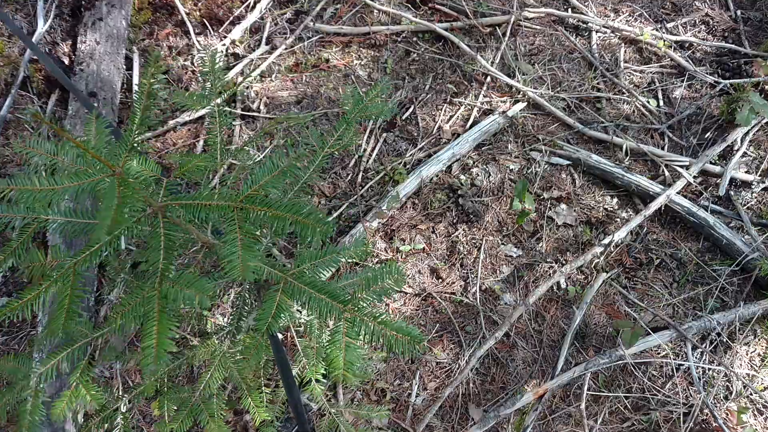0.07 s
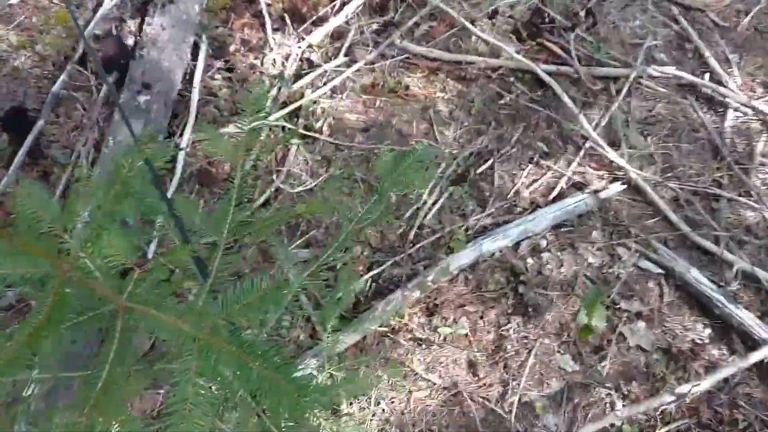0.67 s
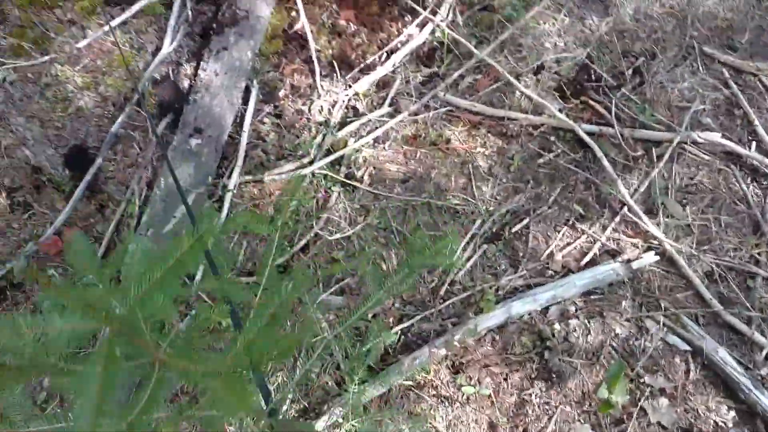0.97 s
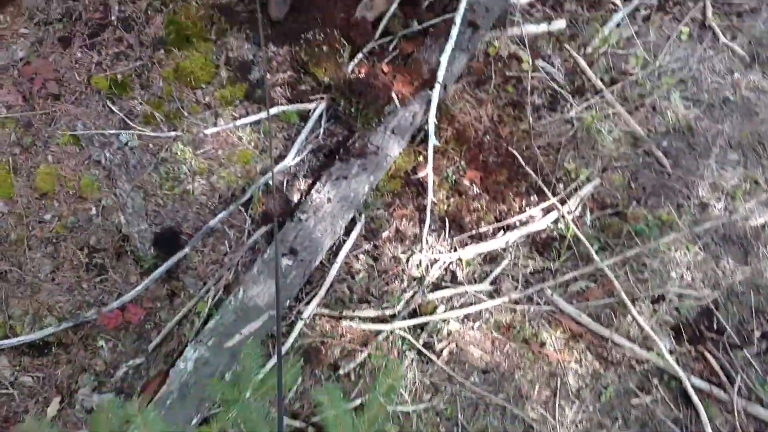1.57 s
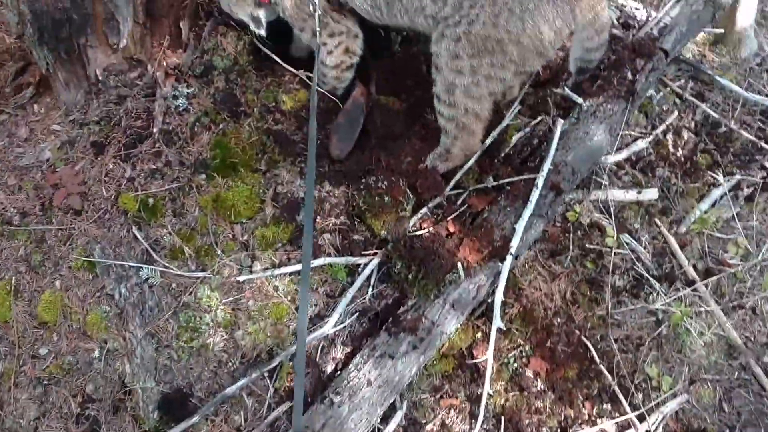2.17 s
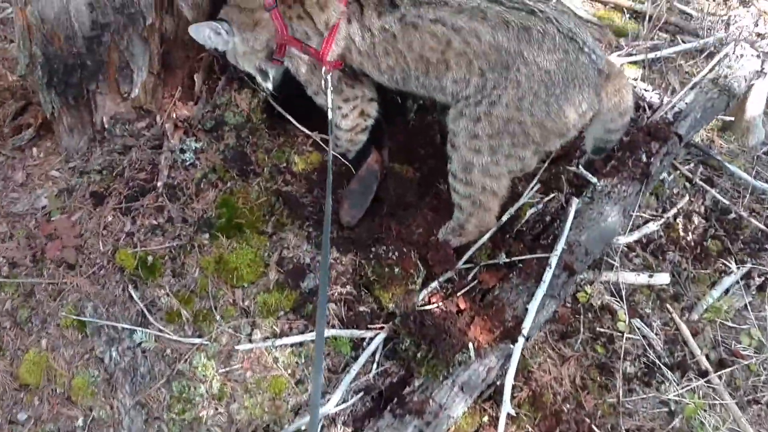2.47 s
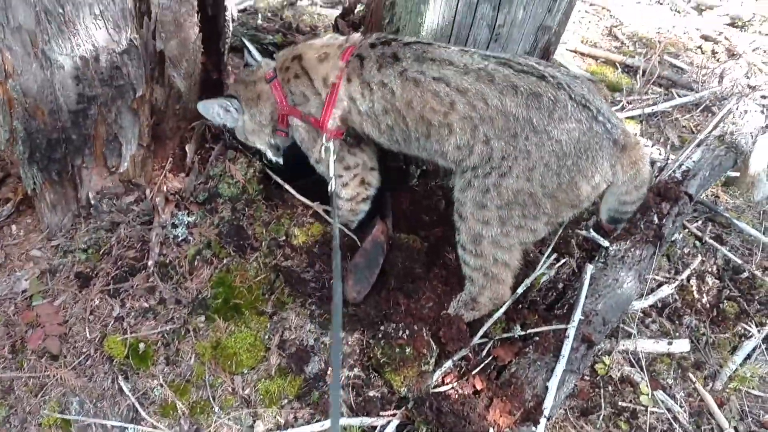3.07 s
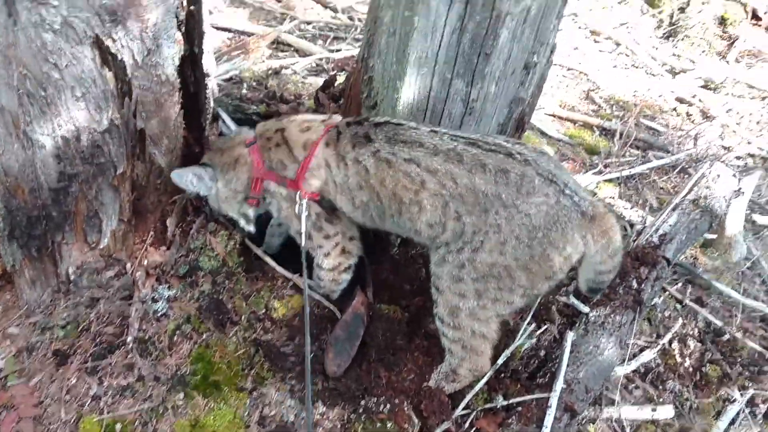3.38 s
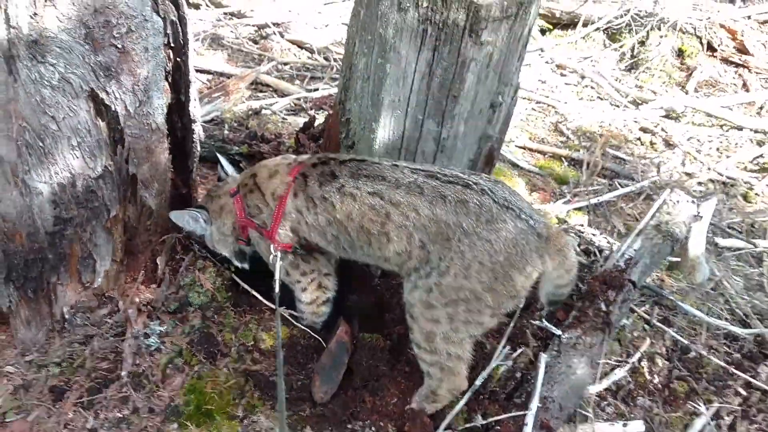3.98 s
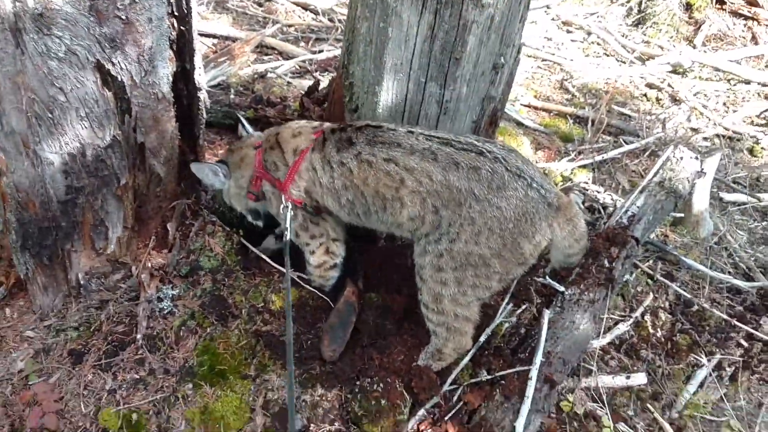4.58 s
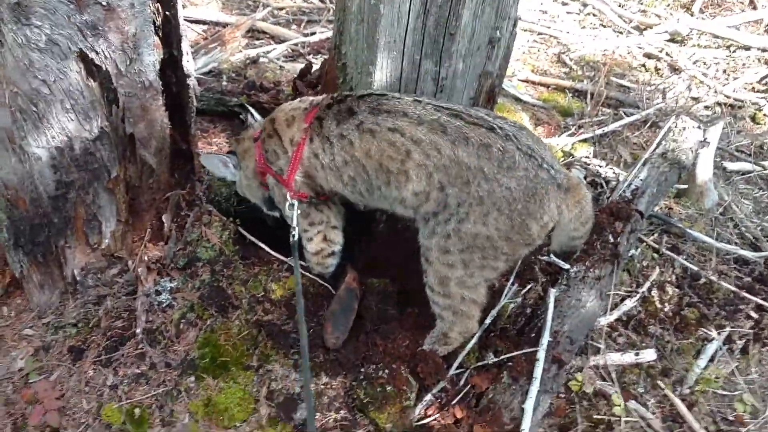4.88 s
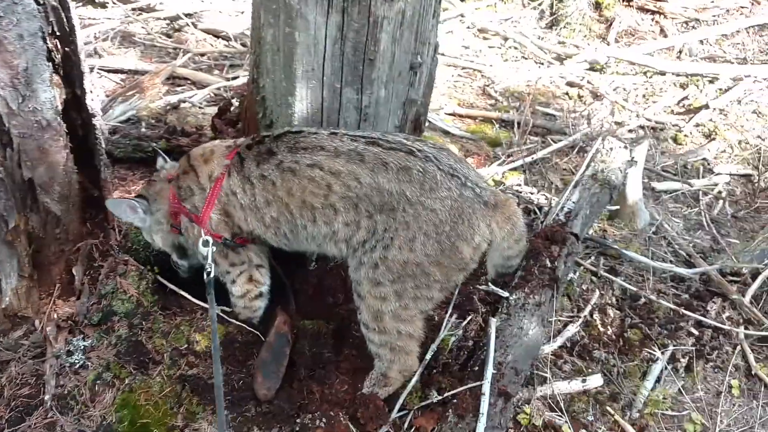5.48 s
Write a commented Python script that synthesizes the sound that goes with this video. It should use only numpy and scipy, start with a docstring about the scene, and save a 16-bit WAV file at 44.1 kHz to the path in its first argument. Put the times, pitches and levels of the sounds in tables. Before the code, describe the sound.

A cat scrapes through dry forest litter with crackling needles and snapping twigs, as wind buffets the microphone and a finger rubs it.

```python
"""A cat scrapes through soil and dry litter by a stump, heard from a phone carried through a breezy wood.
First needles crackle, crumbs grate and twigs snap, hardest just before 0.8 s. From about 1.3 s gusts
rumble under the scraping; eddies then buffet the microphone ports, most heavily around 4 s. From 4.3 s
a finger rubs, creaks and slips on the case. The phone crossfeeds its two ports to widen the stereo."""
import sys
import numpy as np
from scipy import signal
from scipy.fft import rfft, irfft
from scipy.io import wavfile
from scipy.ndimage import uniform_filter1d

SR = 44100
rng = np.random.default_rng(int(sys.argv[2]) if len(sys.argv) > 2 else 0)


def int16_out(signal):
    """Quantize to a 16-bit WAV file."""
    q = np.round(np.clip(np.atleast_2d(signal).T, -1, 1) * 32767)
    wavfile.write(sys.argv[1], SR, q.astype(np.int16))


N = 247842
TIME = np.arange(N) / SR
PORT_LAG = 17  # samples that sound needs from one port to the other
GRIP_S = 4.45  # from here on the finger rests on the case

# Grittiness of the litter; above zero a few big grains stick out: t/s, size spread/dB
GRITTINESS = [(0, -2.5), (.6, 1.5), (.73, -3.5), (.95, -3), (1.8, -2.5), (2.4, 4), (3.2, -3), (4, -4.5),
              (5.6, 4)]
# Steady stirring of the litter: t/s, needle level/dB, soil level/dB
LITTER_STIR = [(.2, -91, -82), (.28, -80, -58), (.5, -56, -61.5), (.85, -53.5, -67), (1.08, -68, -83),
               (1.36, -65, -70), (1.5, -53, -62), (1.75, -59, -58), (1.95, -55.5, -56), (2.38, -65, -61),
               (2.7, -57, -53), (2.96, -70.5, -62), (3.4, -67, -57), (3.799, -61.5, -54.5),
               (4.42, -64.5, -63), (4.72, -62.5, -51), (5, -59, -56), (5.62, -69, -55.5)]
# Bright tone of dry needles and cracking twigs: f/Hz, level/dB
NEEDLE_SPECTRUM = [(300, -39.5), (1200, 0.5), (2200, -1.5), (3500, -3), (5500, -0.5), (8500, -0.5),
                   (11000, -4.5), (14500, -10), (16000, -54)]


def undb(db):
    """Decibels to gain."""
    return 10 ** (np.asarray(db) / 20)


def curve(rows):
    """Automation: rows of t/s, value joined by straight lines."""
    return np.interp(TIME, *np.transpose(rows))


def fade(t, t60):
    """Exponential decay, 60 dB down after t60 seconds."""
    return undb(-60 * t / t60)


def add(out, s, sound):
    """Mix a stereo sound in at s seconds."""
    i = max(int(s * SR), 0)
    out[:, i:i + sound.shape[1]] += sound[:, :max(N - i, 0)]


def eq_gain(points, size):
    """Gain per FFT bin from rows of f/Hz, level/dB, joined over log frequency."""
    hz, db = np.transpose(points)
    return undb(np.interp(np.log(np.fft.rfftfreq(size, 1 / SR) + 1), np.log(hz), db))


def colour(x, points, size=4096):
    """Minimum-phase EQ with the given spectrum; white noise keeps its power."""
    gain = eq_gain(points, size)
    gain /= np.sqrt(np.mean(gain ** 2))
    cepstrum = irfft(np.log(gain))[:size // 2]
    cepstrum[1:] *= 2
    response = irfft(np.exp(rfft(cepstrum, size)))
    return signal.fftconvolve(x, response[None], axes=1)[:, :x.shape[1]]


def diffuse(pair):
    """Sound from many directions: long waves reach both ports alike, short ones unrelated."""
    # Stereo width: f/Hz, side over mid/dB
    width = [(100, -14.5), (2600, -2.5), (5200, 1.5), (8000, 0.5), (11000, 2), (15000, -1.5)]
    mid = pair[0]
    side = irfft(rfft(pair[1]) * eq_gain(width, N), N)
    return np.array([mid + side, mid - side]) / np.sqrt(2)


def pan_left(x, db=4):
    """Lift the left port and lower the right: needles and twigs lie a little to the left."""
    return x * undb([[db], [-db]])


def port_delay(x):
    """Delay by the travel time between the ports."""
    return np.pad(x, ((0, 0), (PORT_LAG, 0)))[:, :N]


def grains(per_s, spread_db, t60, bed):
    """Stereo noise in tiny decaying bursts over a smooth bed, held near level 1."""
    size = undb(spread_db * np.minimum(rng.exponential(size=N), 4.5))
    hits = (rng.random(N) < per_s / SR) * size ** 2
    power = signal.lfilter([1], [1, -fade(1 / SR, t60) ** 2], hits) + 1e-9
    power /= np.maximum(uniform_filter1d(power, size=3500), 1e-9)
    return np.sqrt((power + bed) / (1 + bed)) * rng.standard_normal((2, N))


def push_power(rows, attack_s, build_db, t60):
    """Power of pushes (t/s, length/s, level/dB): each sets in, builds with pressure and dies away."""
    power = 0
    for start, length, db in rows:
        t = TIME - start
        attack = np.clip(t / attack_s, 0, 1)
        build = undb(db + build_db * (np.clip(t / length, 0, 1) - 1.5))
        release = fade(np.maximum(t - length, 0), t60)
        power += (attack * build * release) ** 2
    return power


def woodland(level_db=-56):
    """Faint, even air in the trees."""
    # Tone of the ambience: f/Hz, level/dB
    air_spectrum = [(30, 20), (150, -1.5), (400, 0), (1000, 0.5), (2000, -6.5), (5000, -11), (10000, -9.5),
                    (15000, -29)]
    return undb(level_db) * diffuse(colour(rng.standard_normal((2, N)), air_spectrum))


def airflow_db(gust_edge=6):
    """Wind strength: the breeze plus a swell per gust; an edge of 2 is a bell, higher is more abrupt."""
    # Breeze between gusts: t/s, level/dB
    breeze = [(.15, -69.5), (.38, -59), (.95, -61.5), (1.3, -42.5), (1.75, -45), (2.6, -38), (3.1, -41.5),
              (3.55, -37), (3.85, -30), (4.4, -35), (4.7, -43), (5.05, -44), (5.62, -52)]
    # Gusts over it: peak t/s, length/s, level/dB
    gusts = [(.806, 0.17, -49.5), (1.021, 0.029, -45), (1.152, 0.087, -42.5), (1.272, 0.019, -27),
             (1.375, 0.03, -30.5), (1.518, 0.086, -27.5), (1.629, 0.065, -30), (1.892, 0.11, -33.5),
             (1.984, 0.032, -39), (2.08, 0.026, -38), (2.22, 0.081, -36), (2.308, 0.072, -33.5),
             (2.394, 0.19, -30.5), (2.574, 0.12, -36), (2.694, 0.057, -35), (2.797, 0.1, -30),
             (2.955, 0.094, -26.5), (3.068, 0.15, -34), (3.201, 0.088, -26), (3.354, 0.041, -26),
             (3.51, .07, -41.5), (3.688, .13, -31), (3.96, 0.16, -23.5), (4.11, 0.061, -21),
             (4.248, 0.032, -30.5), (4.423, 0.032, -37), (4.961, 0.29, -31.5), (5.199, 0.021, -26.5),
             (5.422, 0.094, -36)]
    gust_power = sum(undb(db) ** 2 * np.exp(-np.abs(2 * (TIME - s) / length) ** gust_edge)
                     for s, length, db in gusts)
    return 10 * np.log10(undb(curve(breeze)) ** 2 + gust_power)


def wind(whirl_db=-43, whirl_growth=1.5, strong_db=-25):
    """Turbulence rumbles at each port; faster air breaks into smaller whirls, so gusts sound higher."""
    # Low rumble: f/Hz, level/dB
    rumble_spectrum = [(20, -2), (45, -14.5), (75, 4.5), (125, 3.5), (175, 0), (255, -12), (400, -30),
                       (600, -40.5), (1500, -67), (5000, -99)]
    # Low-mid flutter of the whirls: f/Hz, level/dB
    whirl_spectrum = [(120, -25.5), (260, 8), (360, -4), (520, -10.5), (800, -33.5), (1500, -24.5),
                      (4000, -60)]
    flow_db = airflow_db()
    rumble = colour(rng.standard_normal((2, N)), rumble_spectrum) * undb(flow_db + 3)
    whirls = colour(grains(per_s=60, spread_db=7, t60=.027, bed=.32), whirl_spectrum)
    return rumble + whirls * undb(whirl_db + whirl_growth * (flow_db - strong_db))


def buffets(trim_db=-2, width_cycles=.5, whirl_db=-17, whirl_ratio=1.91):
    """Each strong eddy thumps the right port with one short push and pull."""
    # Eddies: t/s, level/dB, f/Hz
    eddies = [(2.273, -18.5, 150), (2.289, -19.5, 148), (2.31, -19.5, 148), (2.389, -13.5, 140),
              (2.416, -11.5, 152), (2.447, -20, 143), (2.77, -17, 143), (2.783, -26, 152),
              (2.835, -20, 117), (2.961, -16.5, 173), (2.98, -24, 140), (3.184, -22, 133),
              (3.217, -27, 125), (3.242, -19, 121), (3.314, -9.5, 165), (3.442, -19.5, 112),
              (3.666, -8.5, 125), (3.683, -12.5, 155), (3.852, -15.5, 153), (3.896, -16, 120),
              (3.962, -21.5, 475), (3.962, -8.5, 137), (4.012, -12, 125), (4.087, -15.5, 134),
              (4.127, -11, 135), (4.144, -16, 148), (4.203, -11, 130), (4.952, -25, 174),
              (5.024, -22.5, 105), (5.226, -17, 190), (5.337, -18, 126)]
    out, t = np.zeros((2, N)), TIME[:2048] - TIME[1024]
    for s, db, hz in eddies:
        eddy, whirl = (np.cos(2 * np.pi * f * t) * np.exp(-.5 * (t * f / width_cycles) ** 2)
                       for f in (hz, hz * whirl_ratio))
        thump = 2 * undb(db + trim_db) * (eddy + undb(whirl_db) * whirl)
        add(out, s + t[0], np.outer([0, -1], thump))
    return out


def case_ring(treble_db, vary_db=.27, detune=.097):
    """One tap on the case; each mode's strength and pitch vary with how the finger lets go."""
    # Modes of the case: f/Hz, t60/s, level/dB, left port gain/right port gain
    modes = [(468, 0.015, 1.5, -0.22), (1000, 0.0074, -3, 0.54), (1860, 0.0076, -6, -0.15),
             (3270, .005, -14, .3), (6700, .002, -16.5, 0.65), (8240, 0.0048, -25.5, 0.53)]
    t, out = TIME[:2048], 0
    for hz, t60, db, left in modes:
        strength, pitch = rng.standard_normal(2)
        mode = np.sin(2 * np.pi * hz * (1 + detune * pitch) * t) * fade(t, t60)
        shelf_db = treble_db * hz / (hz + 1500)
        out += undb(db + vary_db * strength + shelf_db) * np.outer([left, 1], mode)
    return out


def friction(grip_db=-55):
    """Envelope of the finger's friction: separate strokes over its resting grip."""
    # Finger strokes: t/s, length/s, level/dB
    strokes = [(4.305, 0.025, -45.5), (4.5, 0.073, -49), (4.79, 0.058, -42.5), (4.89, 0.11, -37.5),
               (5.01, .1, -39.5), (5.16, 0.053, -29.5)]
    grip = (TIME > GRIP_S) * undb(grip_db)
    return np.sqrt(grip ** 2 + push_power(strokes, attack_s=.011, build_db=6.5, t60=.057))


def catches(count=110, over_friction_db=10.5, spread_db=3.5):
    """Rubbing skin catches and lets go at random, each time tapping the case."""
    out, strength = np.zeros((2, N)), friction()
    times = rng.uniform(GRIP_S, TIME[-1], count)
    sizes = np.clip(rng.standard_normal(count), -2, .2)
    for s, size in zip(times, sizes):
        gain = strength[int(s * SR)] * undb(over_friction_db + spread_db * size)
        add(out, s, gain * case_ring(treble_db=-5))
    return out


def creaks(jitter_s=.0002):
    """Skin sticks and slips in a quick, nearly even run of taps on the case."""
    # Stick-slip runs: start t/s, end t/s, rate/Hz, level/dB, treble/dB
    runs = [(4.504, 4.568, 136, -28, -2.5), (4.949, 4.995, 74, -29, -5)]
    out = np.zeros((2, N))
    for start, end, rate, db, treble_db in runs:
        ring = case_ring(treble_db, vary_db=.5)
        for s in np.arange(start, end, 1 / rate):
            add(out, s + jitter_s * rng.standard_normal(), undb(db + rng.standard_normal()) * ring)
    return out


def slips(trim_db=7.5, ping_db=-4, noise_db=-20, tick_t60=.0013):
    """The stuck finger lets go with a pop: a sharp tick on top of the ring of the case."""
    # Finger pops: t/s, level/dB, treble/dB, ping f/Hz
    pops = [(4.5981, -29.5, 1, 3900), (5.026, -30, -33, 3000), (5.038, -25.5, -35, 3000),
            (5.075, -24, -24.5, 3000), (5.1049, -23.5, -33, 3400), (5.137, -28.5, -20, 3000),
            (5.1602, -25, -23, 3000), (5.1904, -22.5, -17, 3400), (5.1941, -24, -12, 3600),
            (5.197, -35, -6, 3400), (5.2162, -26, -2, 3680), (5.2466, -27, 5.5, 3450),
            (5.282, -28, 1.5, 6060), (5.352, -41, -7, 3400), (5.472, -29.5, 4, 6100),
            (5.511, -30, 4.5, 3480), (5.5345, -28, 0.5, 3300), (5.5551, -27.5, -7.5, 3300),
            (5.598, -30, 0.5, 3600)]
    out, t = np.zeros((2, N)), TIME[:2048]
    for s, db, treble_db, hz in pops:
        ping = undb(ping_db) * np.outer([0, 1], np.sin(2 * np.pi * hz * t))
        noise = undb(noise_db) * rng.standard_normal((2, len(t)))
        tick = undb(treble_db) * fade(t, tick_t60) * (ping + noise)
        add(out, s, undb(db + trim_db) * (2 * case_ring(treble_db) + tick))
    return out


def rubbing(trim_db=1.5):
    """Skin drags over the case with a dull, grainy rasp, mostly on the right."""
    # Tone of the rasp: f/Hz, level/dB
    rub_spectrum = [(80, -35), (250, -15), (450, 2.5), (650, -2.5), (1000, -8), (1900, -15.5),
                    (3300, -17.5), (5000, -34), (12000, -36)]
    texture = colour(grains(per_s=350, spread_db=5, t60=.008, bed=.9), rub_spectrum)
    near, far = texture * friction() * undb(trim_db)
    return np.array([.064 * near + .54 * far, 1.43 * near])


def finger(leak=.17):
    """Handling noise by the right port; some of it travels on to the left one."""
    out = catches() + creaks() + slips() + rubbing()
    out[0] += leak * port_delay(out)[1]
    return out


def swishes():
    """Soft, high hisses that swell and die away."""
    # Swells of hiss: t/s, rise/s, fall/s, level/dB
    swells = [(3.975, 0.024, 0.12, -47), (4.219, 0.13, 0.034, -49), (5.147, 0.047, 0.044, -43)]
    # Airy tone of the hiss: f/Hz, level/dB
    hiss_spectrum = [(800, -11), (2200, -9), (4000, -8), (6000, -4), (9000, -5.5), (11500, -5),
                     (13500, -19), (16000, -31)]
    envelope = sum(undb(db) * np.interp(TIME, [s, s + rise, s + rise + fall], [0, 1, 0])
                   for s, rise, fall, db in swells)
    return envelope * diffuse(colour(rng.standard_normal((2, N)), hiss_spectrum))


def litter(soil_trim_db=3.5):
    """Dry needles crackle brightly; crumbs of soil grate lower down. Each crunch stirs both."""
    # Litter being pressed or scraped: t/s, length/s, needle level/dB, soil level/dB
    crunches = [(0.145, 0.029, -71, -53.5), (0.224, 0.15, -54.5, -71), (0.558, 0.085, -55, -50),
                (0.679, 0.045, -39.5, -42.5), (0.717, 0.054, -32, -42.5), (0.771, 0.068, -44.5, -56.5),
                (1.387, 0.026, -47, -48), (1.51, 0.053, -46.5, -61), (1.571, 0.06, -47.5, -45.5),
                (2.769, 0.12, -58.5, -55), (3.037, 0.13, -62, -53.5), (3.919, 0.038, -66, -47.5)]
    # Dark tone of soil: f/Hz, level/dB
    soil_spectrum = [(60, -29), (200, 6), (450, 4), (900, 1), (1400, -7.5), (2000, -9), (3300, -10),
                     (6000, -25), (15000, -59)]
    gains = []
    for column in (1, 2):  # needles, soil
        stir = undb(curve(np.array(LITTER_STIR)[:, [0, column]]))
        pushes = np.array(crunches)[:, [0, 1, column + 1]]
        gains.append(np.sqrt(stir ** 2 + push_power(pushes, attack_s=.013, build_db=2, t60=.092)))
    needle_gain, soil_gain = gains
    grit_db = curve(GRITTINESS)
    needles = colour(grains(per_s=600, spread_db=grit_db + 1, t60=.003, bed=.25), NEEDLE_SPECTRUM)
    soil = colour(grains(per_s=280, spread_db=grit_db, t60=.009, bed=.25), soil_spectrum)
    return pan_left(diffuse(needles)) * needle_gain + diffuse(soil) * soil_gain * undb(soil_trim_db)


def fractures(level_db, hz, octaves, cycles, spread_db, count, largest=1.9):
    """Bits break at random; each rings for a few cycles at its own pitch and from its own direction."""
    out, t = np.zeros((2, N)), TIME[:1024]
    onsets = (rng.random(count) * N).astype(int)
    traits = np.clip(rng.standard_normal((count, 3)), -2.2, 2.2)
    for i, (size, pitch, side) in zip(onsets, traits):
        f = min(hz * 2 ** (octaves * pitch), SR / 3)
        arrival_s = np.array([[2.2 - side], [2.2 + side]]) * PORT_LAG / SR / 5
        age = np.maximum(t - arrival_s, 0)
        gain = undb(level_db[i] + spread_db * min(size, largest))
        add(out, TIME[i], gain * np.sin(2 * np.pi * f * age) * fade(age, cycles / f))
    return out


def crackles():
    """Needles tick and crumbs of wood click as the litter is stirred, louder where it is gritty."""
    stir, lift_db = np.array(LITTER_STIR), curve(GRITTINESS) / 2
    needle_db, soil_db = (curve(stir[:, [0, column]]) + lift_db for column in (1, 2))
    needles = fractures(needle_db + 9, hz=6850, octaves=.92, cycles=6.6, spread_db=2.5, count=400)
    crumbs = fractures(soil_db + 4, hz=1020, octaves=.55, cycles=11, spread_db=4.5, count=260)
    return pan_left(needles) + crumbs


def snaps(crack_trim_db=-1.5, knock_trim_db=3.5, splinter_db=-2, splinter_t60=.005, thin_range_db=40):
    """Each break is a sharp crack, a splinter's ping and a woody knock, with scatter off the ground."""
    # Twigs and needles: t/s, crack level/dB, crack t60/s, splinter f/Hz, knock level/dB, knock f/Hz
    breaks = [(0.17, -55, .004, 6600, -35, 1140), (0.2555, -44, 0.015, 9050, -61, 1200),
              (.283, -67, .005, 3800, -34.5, 1050), (0.297, -59, .004, 3600, -37, 1000),
              (0.3673, -59, 0.0055, 3740, -34.5, 1090), (.415, -45.5, 0.0027, 7900, -54, 1200),
              (.570, -60, .004, 4000, -37, 1020), (0.582, -51, .004, 3900, -37, 1010),
              (0.594, -59, .003, 8700, -45, 1200), (0.598, -50, 0.0048, 3800, -29.5, 1050),
              (0.6042, -49, 0.0036, 6600, -36, 1220), (.6336, -51, .003, 9500, -58, 1300),
              (0.694, -51, 0.0044, 3670, -34, 1100), (0.7372, -45, 0.0028, 6600, -33, 850),
              (.763, -39, .006, 3870, -28, 744), (0.7732, -23, 0.0026, 9600, -16, 730),
              (0.8403, -33, 0.016, 8500, -26.5, 845), (0.922, -46, .003, 11500, -77, 1300),
              (1.175, -67, 0.0057, 2030, -36, 1230), (1.206, -45.5, 0.0043, 12200, -65, 1320),
              (1.257, -52.5, 0.0094, 3400, -39.5, 744), (1.521, -44, 0.0055, 3700, -38, 1720),
              (1.565, -41, .003, 6500, -46, 1300), (1.587, -39.5, 0.02, 4350, -49, 1940),
              (1.592, -27, 0.017, 8400, -43, 1460), (1.679, -45.5, 0.017, 8850, -37, 850),
              (1.7055, -48, 0.0053, 8800, -51, 940), (1.722, -64, .004, 4000, -37, 913),
              (1.739, -43, 0.0023, 3500, -62, 1300), (1.7504, -44, 0.006, 6400, -36.5, 870),
              (1.765, -62, .003, 4000, -39, 930), (1.771, -35, 0.0042, 9100, -59, 1440),
              (1.8038, -55, .004, 4000, -39, 940), (1.812, -37, 0.0041, 10750, -48, 1270),
              (1.823, -43, 0.005, 9000, -36, 970), (1.831, -58, .003, 6500, -42, 1010),
              (1.8532, -45, 0.0065, 6900, -52, 1200), (1.862, -50, .003, 8900, -52, 1200),
              (1.966, -55, .003, 6500, -48, 1200), (1.987, -48, 0.0027, 6500, -50, 1200),
              (2.023, -43, 0.0045, 9500, -44, 1210), (2.208, -45, 0.0032, 12300, -77, 1200),
              (2.243, -40, 0.0062, 9400, -49, 1018), (2.3273, -34.5, 0.0015, 11600, -80.5, 660),
              (2.7843, -36.5, 0.011, 8600, -32.5, 1520), (2.8221, -38.5, 0.0056, 8800, -35.5, 1470),
              (2.8432, -34, 0.015, 11300, -49, 1580), (2.8505, -35, 0.023, 3970, -68, 970),
              (3.1152, -50, .007, 4000, -42, 1470), (3.1442, -49, 0.0037, 3980, -45, 1400),
              (3.355, -40.5, 0.0027, 3560, -45, 643), (3.499, -61, .004, 3700, -42, 1330),
              (3.515, -52, 0.0076, 3760, -32.5, 1080), (3.5896, -40, 0.017, 3340, -21.5, 1110),
              (3.93, -58, 0.0076, 3800, -40.5, 1640), (3.9424, -52, .004, 6300, -48, 1300),
              (4.124, -78, .007, 3500, -37.5, 1180), (4.2594, -50, 0.0036, 3770, -64, 1300),
              (4.565, -37.5, 0.0092, 6640, -60, 890)]
    # Modes of a twig and the ground under it: f/knock f, t60/s, level/dB
    twig_modes = [(.33, 0.0093, -7.5), (1, 0.012, -4), (1.35, 0.0041, -3.5), (2.9, 0.0033, -18)]
    # Crisp tone of the thinnest pieces: f/Hz, level/dB
    tick_spectrum = [(500, -16), (3000, -15), (6000, -1), (9500, 2), (12500, -1.5), (15500, -4)]
    cracks, ticks, rings = np.zeros((3, 2, N))
    t = TIME[:2048]
    scatter = undb(-30) * fade(t, t60=.07)
    for s, crack_db, crack_t60, splinter_hz, knock_db, knock_hz in breaks:
        size = 2 * undb(crack_db + crack_trim_db)
        envelope = size * (fade(t, crack_t60) + scatter)
        # the less wood rings, the thinner the piece and the higher its tick
        thin = np.clip((crack_db - knock_db) / thin_range_db, 0, 1)
        add(cracks, s, np.sqrt(1 - thin) * envelope * rng.standard_normal((2, len(t))))
        add(ticks, s, np.sqrt(thin) * envelope * rng.standard_normal((2, len(t))))
        splinter = size * undb(splinter_db) * fade(t, splinter_t60) * np.sin(2 * np.pi * splinter_hz * t)
        knock = sum(-(-1) ** k * undb(db) * np.sin(2 * np.pi * ratio * knock_hz * t) * fade(t, t60)
                    for k, (ratio, t60, db) in enumerate(twig_modes))
        add(rings, s, undb(knock_db + knock_trim_db) * knock + pan_left(splinter))
    bursts = colour(cracks, NEEDLE_SPECTRUM) + colour(ticks, tick_spectrum)
    return pan_left(diffuse(bursts)) + rings


def scene():
    """Pressure at the left and right port."""
    return litter() + crackles() + snaps() + swishes() + wind() + buffets() + finger() + woodland()


def record(dry, top_hz=15900):
    """Each channel is its port minus a delayed share of the other; the phone fades in and cuts the top."""
    # Crossfeed: f/Hz, share of the other port
    crossfeed = [(60, 0.86), (1200, 0.63), (2600, 0.85), (5200, 0.6), (7800, 0.59), (10400, 0.25),
                 (13000, 0.91)]
    share = np.interp(np.fft.rfftfreq(N, 1 / SR), *np.transpose(crossfeed))
    opposite = irfft(rfft(port_delay(dry[::-1])) * share, N)
    wide = (dry - opposite) / np.sqrt(2)
    fade_in = np.interp(TIME, [.09, .24], [0, 1]) ** 2
    high_cut = signal.ellip(8, .2, 80, top_hz, fs=SR, output="sos")
    return signal.sosfilt(high_cut, wide * fade_in)


dry = scene()
out = record(dry)
int16_out(out)
```